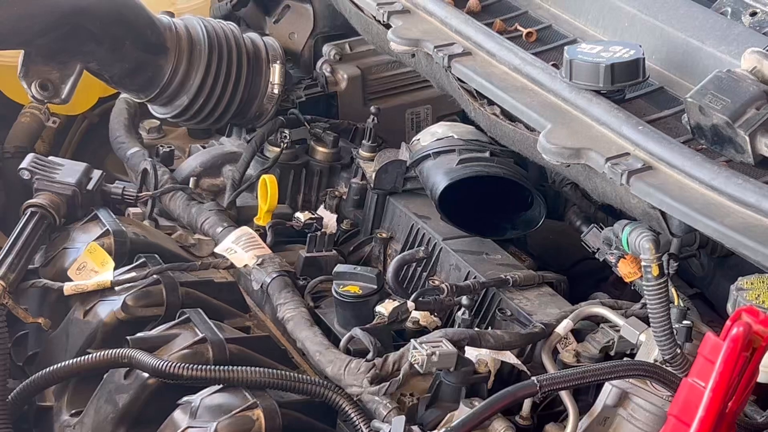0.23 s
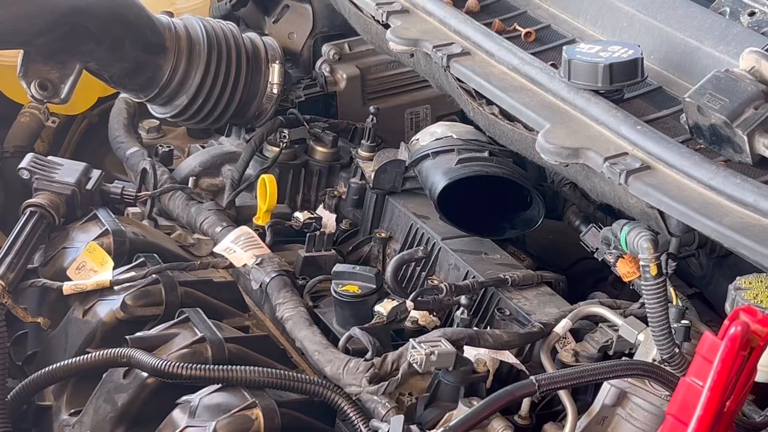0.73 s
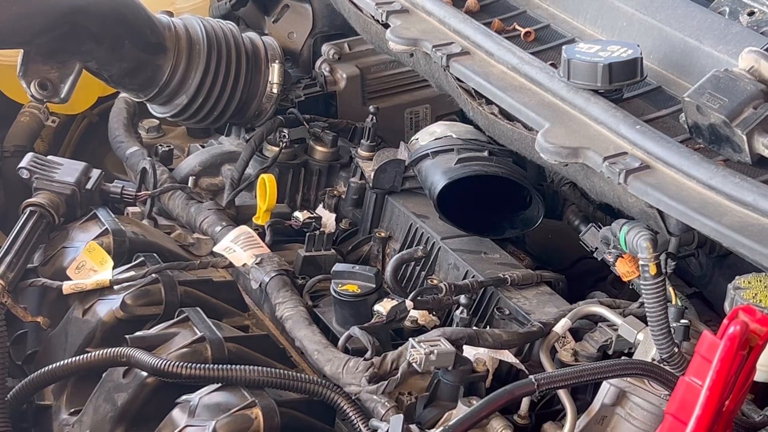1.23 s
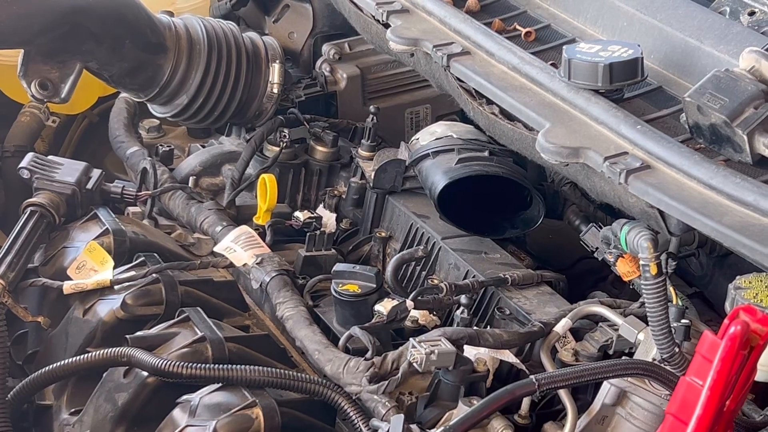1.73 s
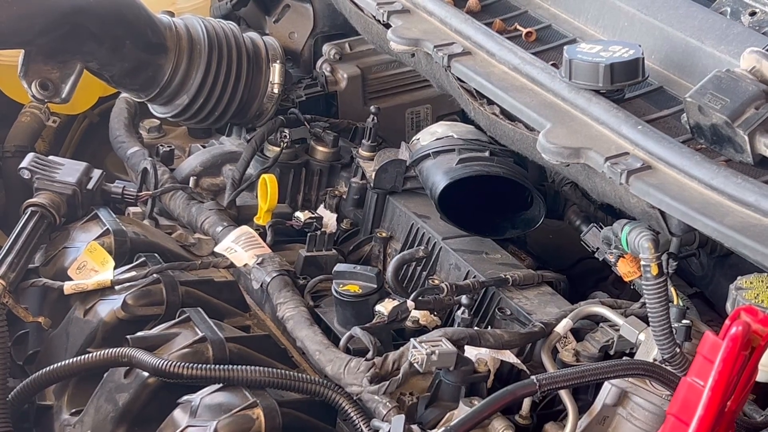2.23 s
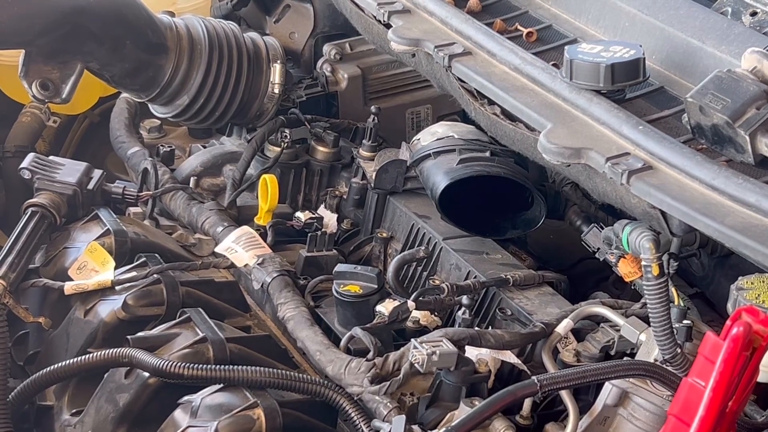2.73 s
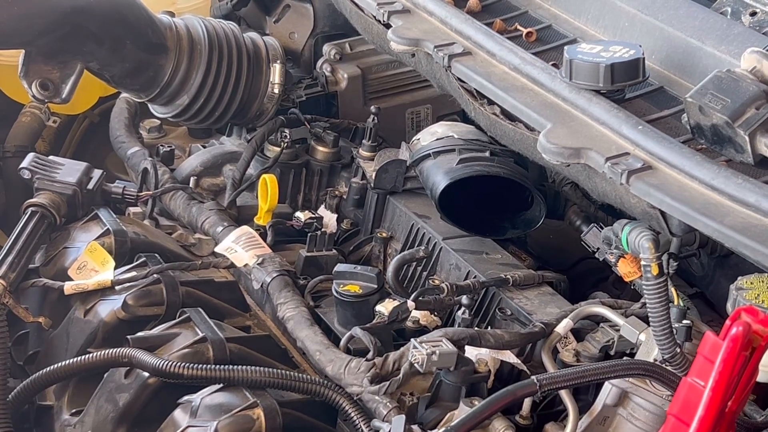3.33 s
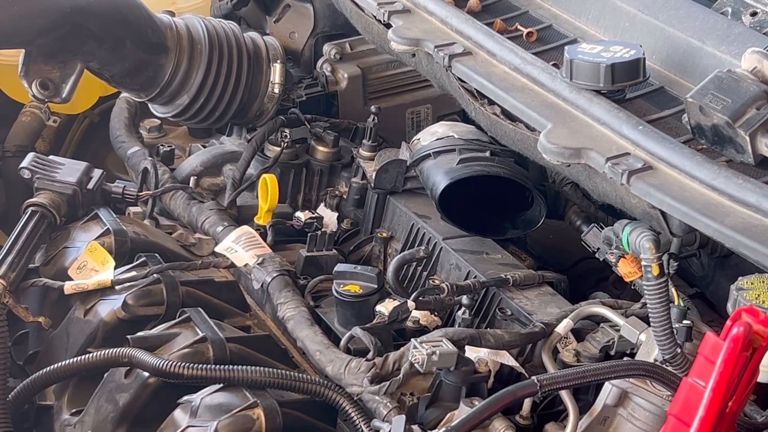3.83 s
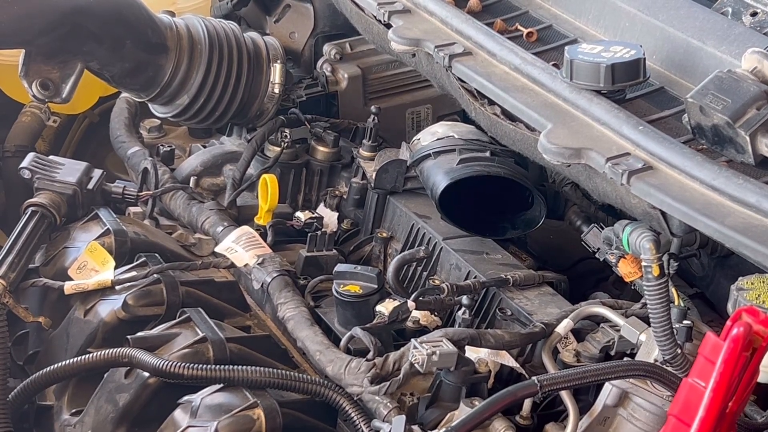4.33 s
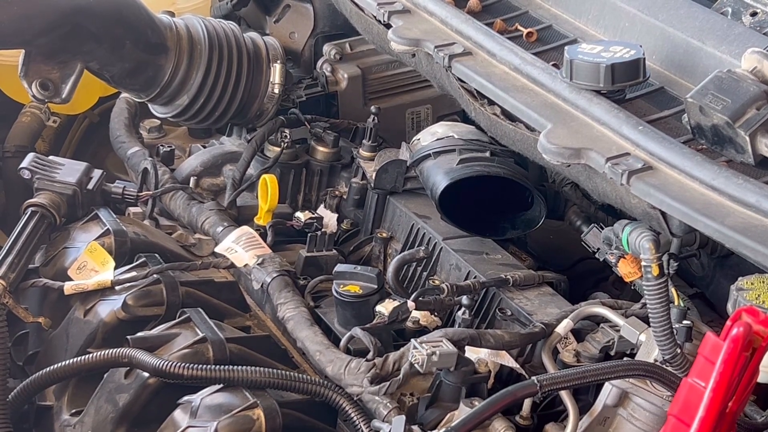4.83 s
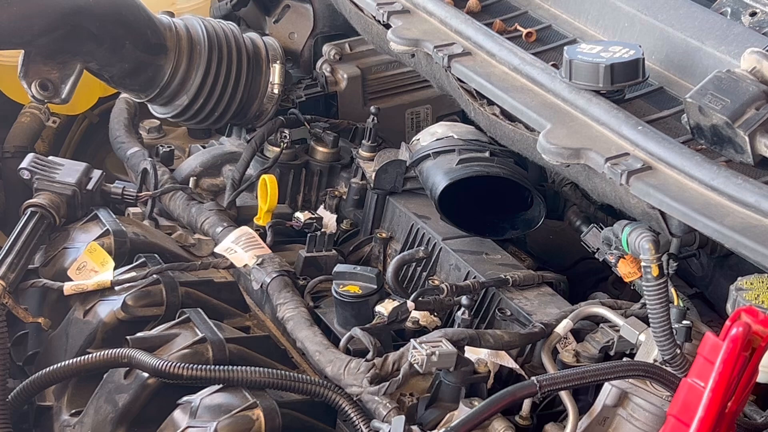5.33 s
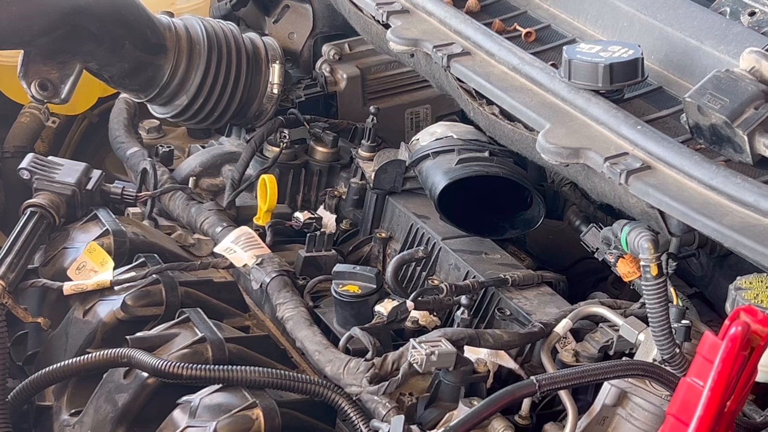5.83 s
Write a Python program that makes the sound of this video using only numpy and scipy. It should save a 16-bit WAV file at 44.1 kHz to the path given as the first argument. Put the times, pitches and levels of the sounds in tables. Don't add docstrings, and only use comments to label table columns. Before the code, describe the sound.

Outdoors beside an open engine bay, a nearby engine hums with a deep, slightly wavering drone over soft traffic rumble and hiss. A faint puff of air leaks at about one second. Halfway through, a loud metallic clack rings briefly, and a small electric motor spins up in a fraction of a second, then whines steadily with bright brush hiss until the end. Close stereo pickup, treble spread wide.

```python
import sys
import numpy as np
from scipy import signal
from scipy.fft import rfft, irfft, next_fast_len
from scipy.io import wavfile
from scipy.ndimage import uniform_filter1d

SR = 44100
rng = np.random.default_rng(int(sys.argv[2]) if len(sys.argv) > 2 else 0)


def invert_db(level):
    return 10 ** (np.asarray(level, dtype=float) / 20)


def transcribe(u):
    v = np.clip(np.atleast_2d(u).T, -1, 1)
    q = np.round(v * 32767).astype(np.int16)
    wavfile.write(sys.argv[1], SR, q)


N = 268657
T = np.arange(N) / SR

# (time [s], firing-pattern rate [Hz], level of the second order [dB])
ENGINE = [(0.1, 47.29, -20.5), (0.64, 50.54, -28), (0.8, 51.3, -23), (0.98, 51.7, -27), (1.47, 54.7, -17.5),
          (1.57, 52.55, -22.5), (1.67, 48.59, -18), (1.79, 45.42, -16), (1.89, 45.45, -22),
          (2.2, 46.87, -15.5), (2.85, 48.7, -10), (3.15, 48.73, -10.5), (3.53, 50.07, -11),
          (3.75, 50.86, -16), (3.92, 50.7, -10), (4.2, 51.07, -12), (4.81, 51.98, -12),
          (6.09, 53.53, -18.5)]
# (time [s], left minus right [dB])
ENGINE_PAN = [(0, 0.1), (.7, 2), (1.2, 3), (1.7, 1.5), (2.2, 1.5), (3.2, .5), (4.7, 0), (5.3, 1),
              (5.9, -1.5)]
OVERTONES = (3, 4, 5, 6, 9)
OVERTONE_DB = (-23.5, -34, -42.5, -46.5, -52)
OVERTONE_SPREAD = (1.1, 1.5, 3.9, 3.1, 2.7)
# (centre [s], rise [s], fall [s], lift [dB])
REFLECTIONS = [
    [(1.3, .3, 0.37, -3.5), (1.61, 0.059, 0.028, 4.5), (2.2, 0.26, .3, -3.5), (3.08, 0.55, .55, -7.5),
     (3.93, 0.13, 0.17, -4), (4.9, 0.34, 0.87, -12)],
    [(.95, .9, 0.19, 13), (1.7, 0.23, .13, 10), (2.25, .4, 0.33, 10.5), (3.58, 0.45, 0.16, 11.5),
     (4.3, 0.66, 0.41, 8.5)],
    [(2.05, .25, 0.27, 10), (2.9, 0.79, .7, 10), (4.0, 0.22, 0.54, 11), (4.73, .1, 0.16, 10.5),
     (5.7, 0.27, 0.43, 9)],
    [(.1, 0.12, 0.23, 14), (1.76, 0.16, 0.075, 11.5), (2.3, 0.64, 0.28, 11.5), (2.74, 0.18, .12, 9),
     (3.4, 0.34, 0.47, 12.5), (4.1, 0.45, .65, 16)],
    [(1.77, 0.12, 0.43, 11), (2.5, 0.74, 0.41, 9), (4.12, 0.18, .4, 13.5), (4.63, 0.53, 0.078, 18.5),
     (5.1, 0.2, 0.42, 16.5), (5.85, 0.57, .6, 14.5)],
]
WEAK_THIRDS = (3, 4, 5, 7, 8, 10, 11, 13, 14, 16, 17, 19, 21, 22, 24, 30, 33, 36)
WEAK_DB = (-4.5, -5.5, -5.5, -6.5, -6.5, -7, 0, 0.5, -8.5, -5, -7, -12.5, -5.5, -10.5, -12, -14.5, -16.5,
           -15.5)
# (frequency [Hz], level [dB per Hz])
ROAR = [(300, -33), (500, 0), (700, -2.5), (900, -5), (1300, -20), (2200, -35.5)]
# (frequency [Hz], level [dB per Hz])
ENGINE_BODY = [(100, -21), (180, 1), (280, -4), (400, -2.5), (550, -9.5), (900, -31)]

# (time [s], speed [Hz])
MOTOR_LOAD = [(3.46, 264.6), (3.8, 265.9), (4.0, 264.9), (4.2, 262), (4.75, 261), (5.08, 265.6),
              (5.3, 264.8), (5.55, 266.5), (5.78, 264.6), (6.09, 266.2)]
# (multiple of shaft speed [ratio], level [dB])
SHAFT_ORDERS = [(6, -58), (7, -58), (11, -63), (12.2, -59), (13.1, -50.5), (14.15, -56), (18.6, -60.5),
                (23, -51.5), (25, -54.5), (27, -53), (31.1, -53), (32, -55), (41.35, -47.5)]
# (frequency [Hz], width [Hz], level [dB])
HOUSING = [(1557, 55, 0), (3040, 14.07, -29), (3644, 40, -1.5), (4760, 140, -16), (5280, 94, -7),
           (6000, 14, -7), (6341, 74, 1), (7200, 120, -9.5), (8330, 45, -2), (8930, 67, -4)]
# (frequency [Hz], level [dB per Hz])
BRUSH_HISS = [(500, -10.5), (1000, -3), (2000, -4), (3500, -0.5), (4500, -1.5), (6500, 0), (8000, -1.5),
              (9500, 1), (11000, 1.5), (12000, -6), (13000, -6), (15000, -7), (15500, -10), (15780, -15)]
# (centre [s], rise [s], fall [s], lift [dB])
COMMUTATOR_FLARE = [(3.31, .05, 0.039, 27)]
# (centre [s], rise [s], fall [s], lift [dB])
BEARING_BEADS = [(3.055, 0.033, 0.022, 17), (3.09, 0.017, 0.028, 25), (3.14, .008, 0.028, 30),
                 (3.21, .06, .11, 18), (3.32, 0.029, 0.18, 29.5)]
# (centre [s], rise [s], fall [s], lift [dB])
CAGE_BEAD = [(3.22, 0.091, 0.12, 15)]
# (time [s], frequency [Hz], level [dB])
HOWL = [(3.01, 1126, -35), (3.076, 1125, -44), (3.108, 1148, -41), (3.156, 1417, -41.5), (3.2, 1510, -38),
        (3.25, 1561, -35), (3.262, 1568, -54), (3.334, 1534, -43), (3.42, 1534, -48)]

# (time [s], peak level [dB])
CLACKS = [
    (2.9933, -5),
    (2.996, -10.5),
    (2.997, -9),
    (3.0031, -13),
]
# (frequency [Hz], level [dB], time to fall 60 dB [s])
SOLENOID_MODES = [(1144, -8.5, 0.027), (1694, -9, 0.013), (2717, -8.5, 0.0088), (3750, -9, 0.0062),
                  (4950, -7.5, 0.011), (6280, 3.5, 0.015), (7540, -17, 0.013), (8470, -9.5, 0.011),
                  (12100, -12, 0.009), (14500, -16, .008)]

# (frequency [Hz], level [dB per Hz])
RUMBLE = [(15, -37.5), (30, -21), (42, -9.5), (55, 3.5), (72, -6.5), (100, 2.5), (140, 0.5), (200, -4.5),
          (300, -35)]
# (centre [s], rise [s], fall [s], lift [dB])
GUSTS = [(.75, .25, .2, 2), (1.45, 0.55, 0.38, 9.5), (2.2, 0.17, 0.19, 4), (2.75, 0.13, 0.11, 11),
         (3.5, 0.29, .25, 11), (4.3, 0.68, 0.27, 0), (4.8, 0.26, 0.21, 9.5), (5.45, 0.5, 0.34, 6.5)]
# (frequency [Hz], level [dB per Hz])
ROAD = [(500, -26.5), (1000, 2), (1400, 4), (1900, 0.5), (2500, 2), (3300, -3.5), (4200, -8.5),
        (6000, -8.5), (8500, -9), (10500, -17.5), (11500, -19), (13000, -31), (15800, -46)]
# (time [s], lift [dB])
NEARNESS = [(0, -2), (1.3, 1.5), (2.4, 7), (3.15, 8.5), (3.65, 14.5), (4.2, 17.5), (4.75, 17.5), (5.1, 12),
            (5.5, 8), (6.09, 2)]
# (frequency [Hz], level [dB per Hz])
FIZZ = [(4000, -33.5), (7000, -0.5), (9000, -6), (12000, -9.5), (15000, -12), (15780, -10)]
# (time [s], level [dB])
APPROACH = [(0, -70.5), (1.6, -68), (2.4, -57.5), (2.95, -51.5), (3.3, -66)]

# (frequency [Hz], lead of the left port [half turns])
PORT_PHASE = [(0, 0), (350, .03), (900, .25), (1400, .05), (1750, 0), (2750, 0), (2900, .04), (3500, .1),
              (4200, 0), (7500, 0), (7700, -.2), (8600, -.4), (9100, -.84), (9450, -1), (10600, -1),
              (11100, -1.22), (12200, -1.75), (12600, -2), (14300, -2), (14800, -2.3), (15300, -2.88),
              (15700, -3)]
# (frequency [Hz], likeness [0 to 1])
LIKENESS = [(60, .98), (300, .94), (800, .6), (1300, .75), (1750, 1), (2750, 1), (2900, .97), (3500, .94),
            (4200, 1), (7500, 1), (7700, .85), (8700, .78), (9450, 1), (10600, 1), (11600, .65), (12600, 1),
            (14300, 1), (14800, .7), (15600, .9)]


def engine():
    hz, boom_db = curves(ENGINE)
    turn = 2 * np.pi * np.cumsum(hz * (1 + 0.0018 * drift(25.35))) / SR
    lean_rad = np.minimum(0.079 - 0.005 * (boom_db + 10.5), 0.12)
    side = np.array([[1], [-1]]) * lean_rad
    order_db = [boom_db] + [db + swells(rows) for db, rows in zip(OVERTONE_DB, REFLECTIONS)]
    tones = np.zeros((2, N))
    for k, db, wide in zip((2, *OVERTONES), order_db, (0.56, *OVERTONE_SPREAD)):
        phase = k * turn + wide * side + 1.75 + 0.12 * k * drift(4)
        tones += invert_db(db + 0.31 * k * drift(16)) * np.cos(phase)

    near_db = curves(NEARNESS)[0]
    body_db = -43 + 0.2 * near_db + 0.095 * (boom_db + 27.5) + 0.18 * swells(GUSTS)
    for k, db in zip(np.array(WEAK_THIRDS) / 3, WEAK_DB):
        phase = k * (turn + 0.18 * side) + 0.36 * drift(8) + 2 * np.pi * rng.random()
        tones += invert_db(body_db + 1.5 + db + 3.1 * drift(3)) * np.cos(phase)

    roar = invert_db(-52 + near_db) * noise(ROAR, patchy_db=0.3)
    roar = roar + invert_db(body_db + 2.5) * noise(ENGINE_BODY, patchy_db=0.4)
    puffing = 1 + 0.24 * np.cos(turn) + 0.2 * np.cos(2 * turn)
    balance = invert_db(np.array([[0.5], [-0.5]]) * curves(ENGINE_PAN)[0])
    return np.sqrt(2) * tones * balance + roar * puffing


def motor():
    on = CLACKS[0][0]
    running_hz = curves(MOTOR_LOAD)[0]
    lag = np.exp(-np.maximum(T - on, 0) / 0.1)
    hunt_hz = 1.25 * np.cos(2 * np.pi * (T - 3.605) / 0.1351)
    shaft_hz = (running_hz + hunt_hz) * (1 - lag)
    sag = running_hz.max() - running_hz
    turn = 2 * np.pi * np.cumsum(shaft_hz * (1 + 0.00069 * drift(60))) / SR
    loaded = np.clip((T - on) / 0.0013, 0, 1)
    speed = loaded * shaft_hz / shaft_hz.max()

    fade_db_per_s = 300
    flare_db = -24 + swells(COMMUTATOR_FLARE)
    settle_db = np.maximum(fade_db_per_s * np.minimum(T - 3.43, 0), flare_db)
    commutator_db = -37 + 0.68 * sag + settle_db
    mesh_db = -40.5 - 1.5 * sag + fade_db_per_s * np.minimum(T - 3.1, 0)
    bearing_db = -59.5
    tones = invert_db(commutator_db + 1.3 * drift(25)) * speed * np.cos(24 * turn)
    tones += invert_db(mesh_db + 1.9 * drift(30)) * np.cos(13.63 * turn + 0.6 * drift(40))
    bearing_gain = invert_db(bearing_db + swells(BEARING_BEADS) + 1.4 * drift(70))
    tones += bearing_gain * np.cos(13.35 * turn + 0.4 * drift(90))
    tones += invert_db(bearing_db + swells(CAGE_BEAD)) * np.cos(19.4 * turn + 0.6 * drift(80))

    orders = np.zeros(N)
    for k, db in SHAFT_ORDERS:
        wake = speed ** (k / 6)
        orders += invert_db(db + 3.4 * drift(20)) * wake * np.cos(k * turn + 1.2 * drift(40))
    orders = 2.2 * orders + through_housing(orders, lift_db=7.5, widen=0.27)
    hiss = brush_hiss(turn, lag, sag)
    return loaded * hiss + np.sqrt(2) * (loaded * tones + orders + ring_and_howl())


def brush_hiss(turn, lag, sag):
    hiss = noise(BRUSH_HISS, patchy_db=1.5) * (1 + 0.17 * np.cos(turn))
    hiss = hiss + through_housing(hiss, lift_db=3.5, widen=1.44)
    level_db = -28.5 - 3 * lag + 0.21 * sag
    return invert_db(level_db + 0.25 * drift(30)) * evened(hiss)


def through_housing(x, lift_db, widen):
    return sum(invert_db(db + lift_db) * resonate(x, hz, widen * width) for hz, width, db in HOUSING)


def ring_and_howl():
    hz, db = curves(HOWL)
    first, last = HOWL[0][0], HOWL[-1][0]
    alive = np.interp(T, [first - 0.03, first, last, last + 0.015], [0, 1, 1, 0])
    phase = 2 * np.pi * np.cumsum(hz) / SR + 0.53 * drift(90)
    return alive * invert_db(db + 1.7 * drift(70)) * np.cos(phase)


def solenoid():
    t, out = np.arange(6000) / SR, np.zeros((2, N))
    for s, peak_db in CLACKS:
        ring = np.zeros(len(t))
        for hz, db, t60 in SOLENOID_MODES:
            level_chance, pitch_chance = rng.standard_normal(2)
            wave = np.sin(2 * np.pi * hz * (1 + 0.024 * pitch_chance) * t)
            ring += invert_db(db + 2 * level_chance - 60 * t / t60) * wave
        shared, own = uniform_filter1d(rng.standard_normal((2, len(t))), size=3, axis=1)
        crack = (shared + np.array([own, -own])) * invert_db(-6.5 - 60 * t / 0.012)
        onset = np.minimum(t / 0.00025, 1)
        start = round(s * SR)
        out[:, start:start + len(t)] += invert_db(peak_db) * (ring / abs(ring).max() + crack) * onset
    return out


def street():
    rumble_db = -41 + swells(GUSTS)
    road_db = -49 + 0.75 * curves(NEARNESS)[0]
    start, end = 1.02, 1.07
    puff = np.interp(T, [start - 0.004, start + 0.012, end - 0.01, end + 0.02], [0, 1, 0.8, 0])
    fizz = (invert_db(curves(APPROACH)[0]) + invert_db(-59) * puff) * noise(FIZZ, patchy_db=1.5)
    rumble = invert_db(rumble_db) * noise(RUMBLE, patchy_db=4.0, size=2048)
    road = invert_db(road_db + 0.6 * drift(29.48)) * noise(ROAD, patchy_db=0.66)
    return rumble + road + fizz


def noise(spectrum, patchy_db, size=1024):
    hop = size // 4
    frames, hz = N // hop + 5, np.fft.rfftfreq(size, 1 / SR)
    a, b, c, d, patches = rng.standard_normal((frames, len(hz), 5)).T
    patches = uniform_filter1d(patches, size=9, axis=0)
    patches = evened(uniform_filter1d(patches, size=11, axis=1))
    same = np.clip(read(LIKENESS, hz), 0, 1)[:, None]
    shared = np.sqrt((1 + same) / 2) * (a + 1j * b)
    own = np.sqrt((1 - same) / 2) * (c + 1j * d)
    level_db = read(spectrum, hz)[:, None] + patchy_db * patches
    z = np.array([shared + own, shared - own]) * invert_db(level_db)
    z = z * (hz < spectrum[-1][0])[:, None]
    return evened(signal.istft(z, nperseg=size, noverlap=size - hop)[1][:, :N])


def resonate(x, hz, width):
    return signal.lfilter(*signal.iirpeak(hz, hz / width, SR), x)


def drift(top_hz):
    t = T[::64]
    waves = np.zeros(len(t))
    for f in np.geomspace(top_hz / 12, top_hz, 12):
        waves += np.sin(2 * np.pi * (f * t + rng.random())) / np.sqrt(f)
    return np.interp(T, t, evened(waves))


def swells(rows):
    total_db = np.zeros(N)
    for s, rise, fall, db in rows:
        distance = (T - s) / np.where(T < s, rise, fall)
        total_db += db * np.clip(1 - distance ** 2, 0, 1)
    return total_db


def curves(rows):
    s, *columns = np.transpose(rows)
    return [np.interp(T, s, c) for c in columns]


def read(points, hz):
    f, value = np.transpose(points)
    return np.interp(np.log(hz + 1), np.log(f + 1), value)


def evened(x):
    return x / np.sqrt(np.mean(x ** 2) + 1e-20)


def scene():
    return engine() + motor() + solenoid() + street()


def low_pass(x):
    return signal.sosfilt(signal.butter(12, 16480, fs=SR, output="sos"), x)


def record(dry):
    size = next_fast_len(N + 4096)
    f, lead = np.transpose(PORT_PHASE)
    half = np.interp(np.fft.rfftfreq(size, 1 / SR), f, lead) * np.pi / 2
    shift = np.exp(1j * np.array([half, -half]))
    ports = irfft(rfft(dry, size) * shift, size)[:, :N]
    opening = np.clip((T - 0.0335) / 0.001, 0, 1)
    return low_pass(ports * opening)


dry = scene()
out = record(dry)
transcribe(out)
```